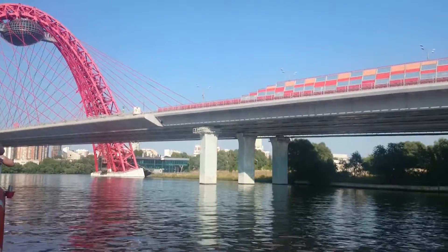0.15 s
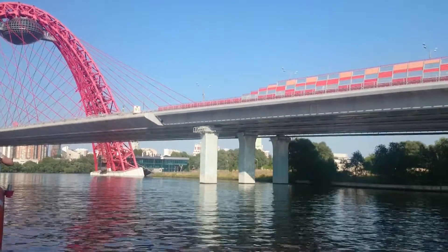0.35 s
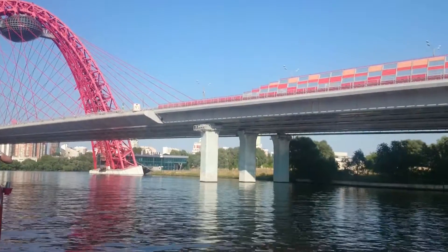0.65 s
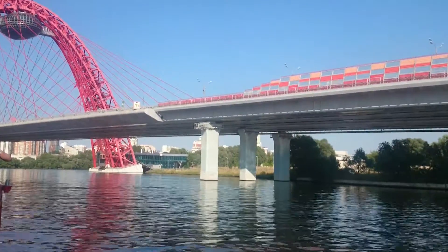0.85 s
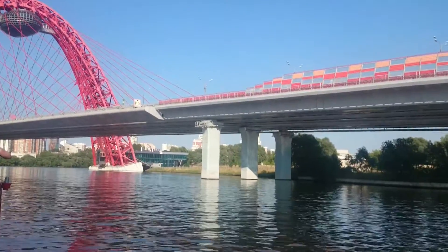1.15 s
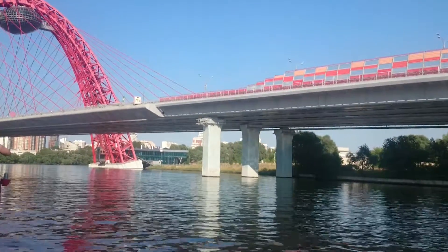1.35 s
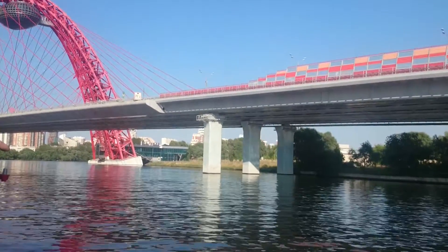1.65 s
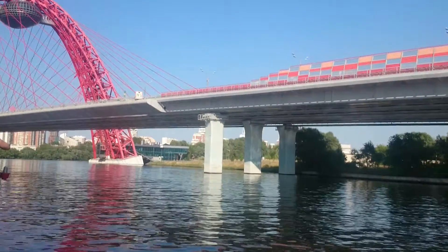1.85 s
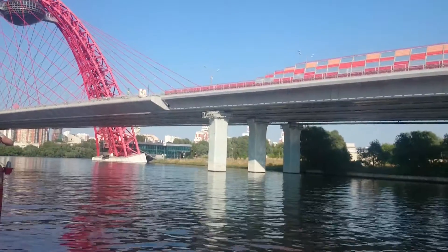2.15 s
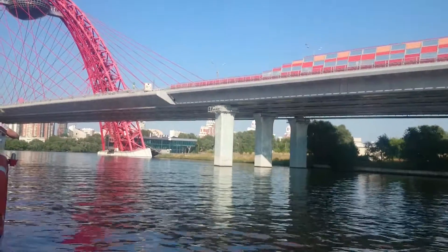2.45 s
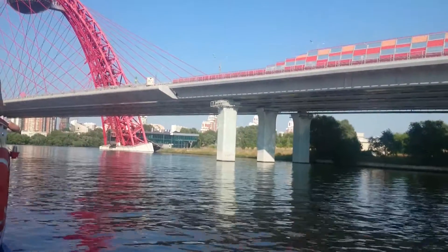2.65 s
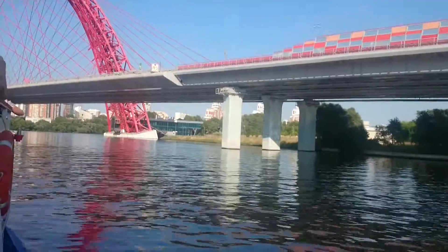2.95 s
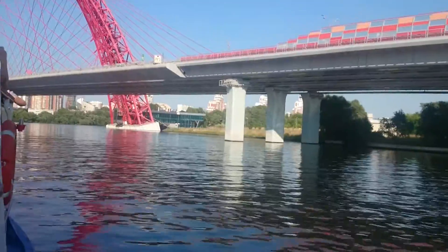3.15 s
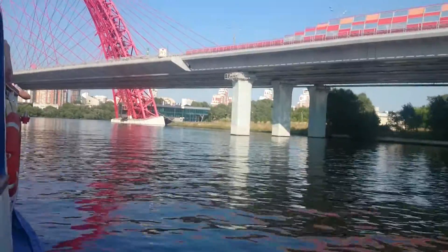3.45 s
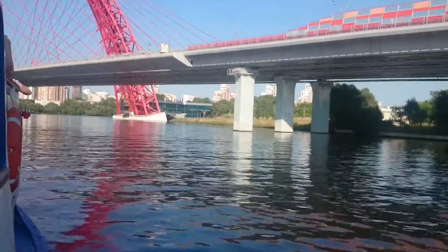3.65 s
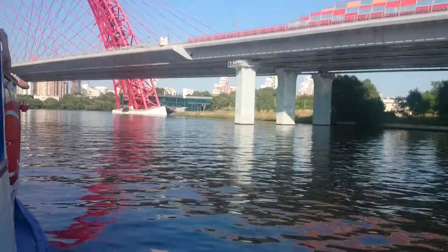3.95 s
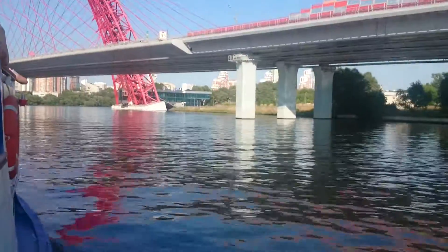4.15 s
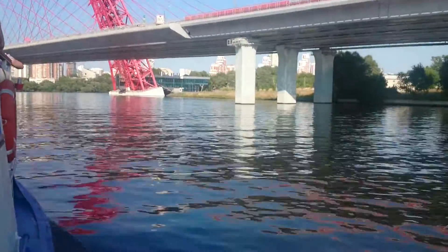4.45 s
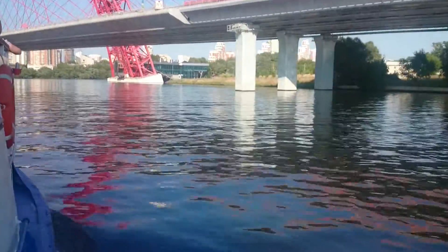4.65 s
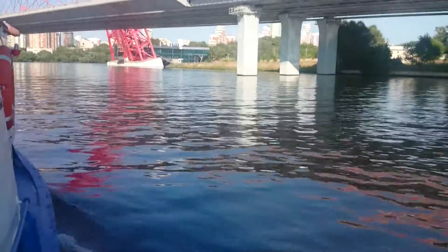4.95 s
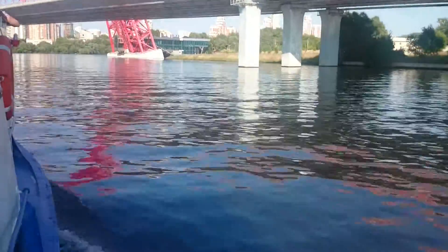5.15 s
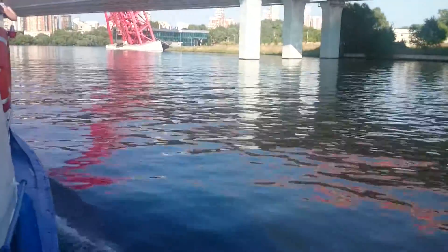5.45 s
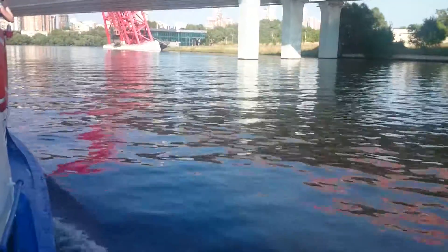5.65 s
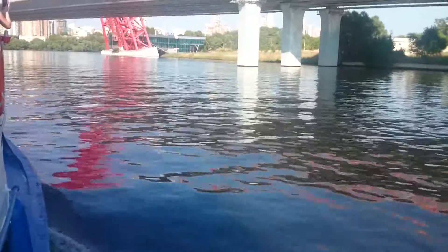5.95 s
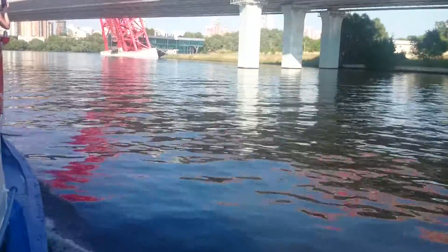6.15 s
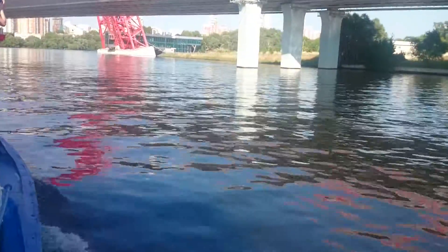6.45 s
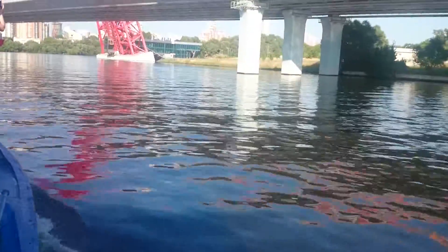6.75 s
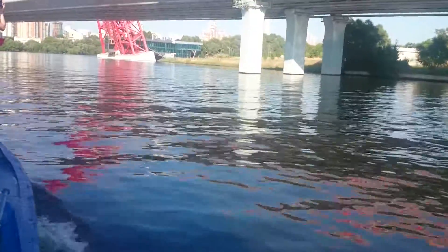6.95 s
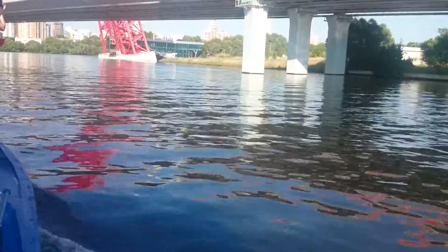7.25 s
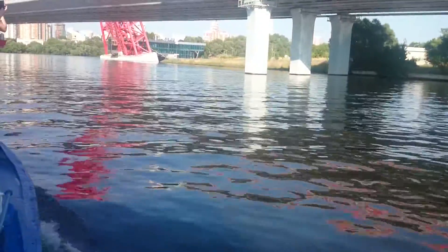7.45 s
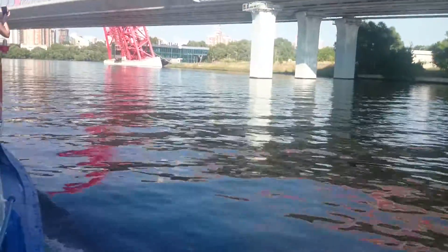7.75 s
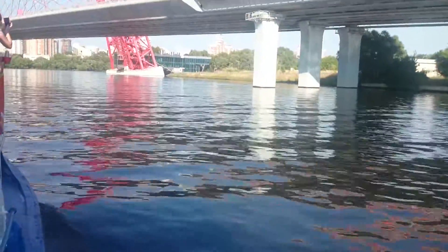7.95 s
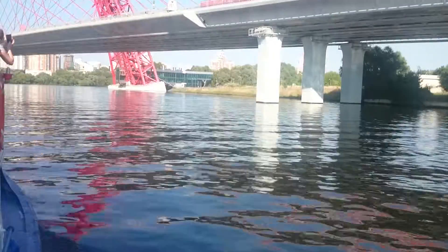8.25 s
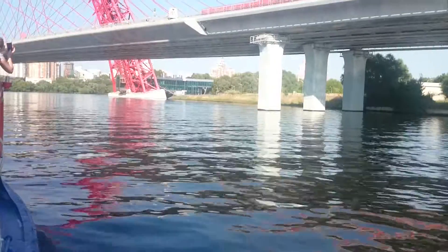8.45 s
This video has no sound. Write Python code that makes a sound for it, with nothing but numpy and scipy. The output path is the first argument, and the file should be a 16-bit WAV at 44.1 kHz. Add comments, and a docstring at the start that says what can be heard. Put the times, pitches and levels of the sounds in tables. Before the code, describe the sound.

On deck, a deep throbbing diesel-like drone with hissing and churning water, punctuated by regular rattly metallic clacks that stop before the end.

```python
"""Small river boat under way, heard from the deck

A six-cylinder four-stroke engine drones below: harmonic exhaust lines, hull knocks and beating machinery hiss.
Shaped noise makes rushing water, with one wave swelling under the bow, and a soft ventilation roar.
A loose part clacks about twice a second until it rests: noise bursts through resonances, with thin bright ticks.
The microphone tips towards the water and partly back, which shifts the balance."""
import sys
import numpy as np
from scipy import signal
from scipy.fft import rfft, irfft, next_fast_len
from scipy.io import wavfile
from scipy.ndimage import uniform_filter1d, map_coordinates

SR = 44100
rng = np.random.default_rng(int(sys.argv[2]) if len(sys.argv) > 2 else 0)


def wav_out(sig):
    """Save sig, one row per channel (or a flat mono array), as 16-bit PCM at SR to the path in sys.argv[1]."""
    wavfile.write(sys.argv[1], SR, np.round(np.clip(np.atleast_2d(sig).T, -1, 1) * 32767).astype(np.int16))


N = 378819  # samples
CYLINDERS = 6
FIRING_HZ = 43.845  # mean firings per second, all cylinders


def amp(db):
    """Decibels to gain."""
    return 10 ** (np.asarray(db) / 20)


def unit(x):
    """Scale to rms 1."""
    return x / np.sqrt(np.mean(x ** 2) + 1e-20)


def along(points, hz):
    """Interpolate (Hz, value) points on a log frequency axis."""
    point_hz, value = np.transpose(points)
    return np.interp(np.log(hz + 1), np.log(point_hz + 1), value)


def curves(rows):
    """One value per sample for each column after the time in seconds."""
    time_s, *columns = np.transpose(rows)
    return [np.interp(np.arange(N) / SR, time_s, column) for column in columns]


def wobble(rate_hz):
    """Smooth random curve through rate_hz random knots a second."""
    knots = rng.standard_normal(int(N * rate_hz / SR) + 4)
    return map_coordinates(knots, [np.arange(N) * rate_hz / SR])


def filtered(x, response):
    """Multiply the spectrum of x by a complex response of frequency."""
    n = x.shape[-1]
    padded = next_fast_len(n + 8192)
    spectrum = rfft(x, padded) * response(np.fft.rfftfreq(padded, 1 / SR))
    return irfft(spectrum, padded)[..., :n]


def coloured(x, spectrum):
    """Shape x by (Hz, relative dB) points, at rms 1."""
    return unit(filtered(x, lambda hz: amp(along(spectrum, hz))))


def sides(lean_db):
    """Left and right gains for a left-minus-right level difference."""
    return amp(np.array([[.5], [-.5]]) * lean_db)


# Level balance of the ports. Each row: frequency in Hz, left minus right in dB.
PORT_LEAN = [(44, -6.5), (80, -5.5), (200, -4), (380, -3.5), (520, -0.5), (800, -0.2), (1150, -2),
             (1700, -7), (2400, -2.5), (4000, -5.5)]
# Phase offset of the ports. Each row: frequency in Hz, lead of the left port in radians.
PORT_LEAD = [(44, 1), (90, 0.13), (160, 0.49), (380, 0.47), (700, 0.51), (1500, 0.31)]


def ports(hz):
    """Complex left and right gains: the two ports differ in level and phase."""
    half_turn = np.array([[.5j], [-.5j]])
    return sides(along(PORT_LEAN, hz)) * np.exp(half_turn * along(PORT_LEAD, hz))


# Likeness of the two sides before the ports. Each row: frequency in Hz, left-right correlation.
CORRELATION = [(100, 0.94), (250, 0.96), (600, 0.78), (1400, 0.39), (3000, 0.35), (7000, .1)]


def on_deck(pair):
    """Mix two unrelated signals into left and right: alike in the bass, louder on the right."""
    def mid_side_gains(hz):
        angle = np.arccos(np.clip(along(CORRELATION, hz), -1, 1)) / 2
        return np.array([np.cos(angle), np.sin(angle)])

    mid, side = filtered(pair, mid_side_gains)
    return unit(filtered(np.array([mid + side, mid - side]), ports))


def add(track, start_s, sound):
    """Mix a short stereo sound into track."""
    part = track[:, max(round(start_s * SR), 0):][:, :sound.shape[1]]
    part += sound[:, :part.shape[1]]


def rush(spectrum, patchy_db):
    """Stereo noise of rms 1 whose time-frequency gain varies in smooth random patches."""
    z = signal.stft(rng.standard_normal((2, N)), nperseg=512)[2]
    field = rng.standard_normal(z.shape[1:])
    field = uniform_filter1d(field, size=5, axis=0)  # frequency bins
    field = uniform_filter1d(field, size=12, axis=1)  # frames
    pair = signal.istft(z * amp(patchy_db * unit(field)), nperseg=512)[1][:, :N]
    return on_deck(coloured(pair, spectrum))


# Engine-room ventilation spectrum. Each row: frequency in Hz, relative spectral level in dB.
FAN_SPECTRUM = [(250, -34), (480, 8.5), (700, -4), (1200, -6), (1400, 4.5), (1750, 3), (2100, -2),
                (3500, -40), (7000, -49)]
FAN_LEVEL_DB, FAN_TILT_DB = -33, -8  # at no tilt; change at full tilt


def fan(tilt, patchy_db=1.2):
    """Soft roar of moving air that fades as the microphone turns away."""
    return amp(FAN_LEVEL_DB + FAN_TILT_DB * tilt) * rush(FAN_SPECTRUM, patchy_db)


# Churning water and hull rumble. Each row: frequency in Hz, relative spectral level in dB.
CHURN_SPECTRUM = [(25, -20), (32, -17), (42, -6), (60, 4), (100, 6.5), (165, 4.5), (240, 3.5), (320, -1),
                  (385, -1), (450, -2), (560, -3), (780, -9), (1080, -8), (1700, -9.5), (2200, -14.5),
                  (3300, -15), (7000, -44)]
# Water slapping under the bow. Each row: frequency in Hz, relative spectral level in dB.
BOW_SPECTRUM = [(120, -31), (270, -1.5), (450, -9), (600, -2), (760, -13.5), (1060, -1), (1350, -18),
                (2500, -30), (6000, -42)]
BOW_LEVEL_DB, BOW_TILT_DB = -39, 7  # at no tilt; change at full tilt
WAVE_CREST_S, WAVE_WIDTH_S = 3.35, 0.24  # width: crest to 1/e
WAVE_BOW_DB, WAVE_CHURN_DB = 3, 1  # rise at the crest


def water(tilt, churn_db=-23.5):
    """Turbulent churning plus bow wash that grows with tilt; one wave lifts both."""
    wave = np.exp(-((np.arange(N) / SR - WAVE_CREST_S) / WAVE_WIDTH_S) ** 2)
    churn_gain = amp(churn_db + WAVE_CHURN_DB * wave)
    bow_gain = amp(BOW_LEVEL_DB + BOW_TILT_DB * tilt + WAVE_BOW_DB * wave)
    churn = churn_gain * rush(CHURN_SPECTRUM, patchy_db=1.13)
    wash = bow_gain * rush(BOW_SPECTRUM, patchy_db=2.5)
    return churn + wash


def chatter(rise_s, t60_s, tail_db, tail_t60_s, grain_db):
    """Grainy burst of tiny contacts peaking after rise_s, plus a tail of scatter off the deck; rms 1."""
    t = np.arange(SR // 4) / SR - rise_s
    swell = np.clip(1 + t / rise_s, 0, 1) ** 2
    after = np.maximum(t, 0)
    grain = np.interp(t, np.linspace(t[0], t[-1], num=160), rng.standard_normal(160))
    contacts = unit(amp(grain_db * grain)) * amp(-60 * after / t60_s)
    tail = amp(tail_db - 60 * after / tail_t60_s)
    shared, left, right = rng.standard_normal((3, len(t)))
    return unit(swell * (contacts + tail) * (shared + np.array([left, right])))


# Bright edge of a contact. Each row: frequency in Hz, relative spectral level in dB.
SNAP_SPECTRUM = [(1500, -5), (4000, 10), (7500, 1), (9300, 1), (11000, 2.5), (13000, -2), (15500, -10)]
# Thin bright ticks, two of them the sharp snap of a clack.
# Each row: peak time in seconds, level in dB, left minus right in dB.
TICK_EVENTS = [(0.233, -40, 5), (2.059, -42, 5), (5.004, -53, -3), (5.648, -45, -1), (5.934, -44, 9)]


def ticks(rise_s=0.0034):
    """Bright noise bursts: light touches, and extra snap on two clacks."""
    out = np.zeros((2, N))
    for peak_s, db, lean_db in TICK_EVENTS:
        touch = chatter(rise_s=rise_s, t60_s=0.09, tail_db=-13, tail_t60_s=.15, grain_db=1)
        add(out, peak_s - rise_s, amp(db) * sides(lean_db) * coloured(touch, SNAP_SPECTRUM))
    return out


# Resonances of the loose part. Each row: centre in Hz, width in Hz, relative level in dB.
RING_MODES = [(1690, 360, -7), (2364, 190, 6), (2575, 92, 3.5), (2740, 137, 4), (3200, 830, -19)]
# Rasp of its contact. Each row: frequency in Hz, relative spectral level in dB.
RASP_SPECTRUM = [(900, -24), (1500, -15), (3500, -6.5), (4500, 0), (5400, 5.5), (6300, -17), (9000, -25)]
# Blows of the loose part. Each row: nominal time in seconds, ring level in dB, rasp level in dB.
CLACK_EVENTS = [(0.2263, -30.5, -46), (0.698, -39, -50), (1.158, -28.5, -43), (1.5972, -29.5, -34.5),
                (2.5282, -30, -30.5), (2.9846, -32, -31), (3.473, -35, -35.5), (3.9683, -42, -39),
                (4.3782, -33.5, -31.5), (4.827, -30.5, -37), (5.228, -29.5, -34), (5.9317, -32.5, -35),
                (6.3747, -40, -45)]


def ring_response(hz):
    """Sum of band-pass resonances of alternating sign."""
    total = 0
    for k, (centre_hz, width_hz, db) in enumerate(RING_MODES):
        damping = 1j * hz * width_hz
        total = total + (-1) ** k * amp(db) * damping / (centre_hz * centre_hz - hz * hz + damping)
    return total


def clacks(snap_db=-22, lean_db=-2.0, snap_lean_db=3, lead_s=.0092):
    """Loose part chatters on its seat and rings briefly; its bright snap scales with the ring."""
    out = np.zeros((2, N))
    for time_s, ring_db, rasp_db in CLACK_EVENTS:
        blow = chatter(rise_s=0.012, t60_s=0.09, tail_db=-13, tail_t60_s=0.3, grain_db=5.5)
        contact = chatter(rise_s=0.0085, t60_s=0.13, tail_db=-21, tail_t60_s=0.17, grain_db=2.5)
        ring = amp(ring_db) * unit(filtered(blow, ring_response))
        rasp = amp(rasp_db) * coloured(contact, RASP_SPECTRUM)
        snap = amp(ring_db + snap_db) * coloured(contact, SNAP_SPECTRUM)
        clack = sides(lean_db) * (ring + rasp) + sides(snap_lean_db) * snap
        add(out, time_s - lead_s, clack)
    return out


# Hiss at the left port. Each row: frequency in Hz, relative spectral level in dB.
LEFT_HISS_SPECTRUM = [(1500, -34), (3400, -11.5), (4400, 1.5), (5300, 2), (6000, -8.5), (6600, -11.5),
                      (9300, -14), (11000, -11.5), (12500, -22), (15000, -64)]
# Hiss at the right port. Each row: frequency in Hz, relative spectral level in dB.
RIGHT_HISS_SPECTRUM = [(1500, -35), (3700, -12.5), (4600, -3.5), (5150, -0.5), (5550, 2.5), (6100, -9),
                       (7000, -17), (8500, -24), (11000, -26.5), (12600, -35), (14000, -25.5), (15800, -30)]
# Hiss level before port offsets and flutter. Each row: time in seconds, level in dB.
HISS_CURVE = [(0, -29.7), (2.3, -29.8), (3.3, -29), (4.2, -28), (5.2, -29), (8.59, -28)]
# Clatter by cylinder in firing order. Each entry: relative strength in dB.
CYLINDER_CLATTER_DB = [-7, -9, 4, -45, 3.5, -3]


def hiss(cycle, clatter=0.25, flutter_db=.85, left_db=-3.0, right_db=6.0):
    """Machinery noise, independent at each port, that swells with the clatter of each cylinder."""
    hiss_db, = curves(HISS_CURVE)
    firing = cycle * CYLINDERS
    strength = amp(CYLINDER_CLATTER_DB)[np.round(firing).astype(int) % CYLINDERS]
    beat = unit(1 + clatter * strength * np.cos(np.pi * firing) ** 2)
    left, right = rng.standard_normal((2, N))
    left = amp(left_db) * coloured(left, LEFT_HISS_SPECTRUM)
    right = amp(right_db) * coloured(right, RIGHT_HISS_SPECTRUM)
    return np.array([left, right]) * beat * amp(hiss_db + flutter_db * wobble(18))


# What the hull passes of each firing. Each row: frequency in Hz, relative spectral level in dB.
HULL_SPECTRUM = [(35, -50), (55, 5), (90, -2), (200, -0.5), (240, -22), (320, -10), (380, 1), (450, -10),
                 (600, -2), (720, -8), (1050, -8), (1250, -19), (1400, -7), (3000, -37)]


def knocks(cycle, t60_s=0.22, scatter_db=2.0, level_db=-30.0):
    """Each cylinder shakes the hull along its own decaying path, so the pattern repeats every cycle."""
    t = np.arange(SR // 8) / SR
    paths = rng.standard_normal((CYLINDERS, 2, len(t))) * amp(-60 * t / t60_s)
    firings = np.flatnonzero(np.diff(np.floor(cycle * CYLINDERS)))
    out = np.zeros((2, N))
    for k, sample in enumerate(firings):
        add(out, sample / SR, paths[k % CYLINDERS] * amp(scatter_db * rng.standard_normal()))
    return amp(level_db) * on_deck(coloured(out, HULL_SPECTRUM))


# Engine lines. Each row: multiple of the four-stroke cycle rate, rms level in dB before swell, drift and ports.
ENGINE_LINES = [(6, -24), (7, -43.5), (8, -39), (9, -41.5), (10, -40), (11, -38.5), (12, -29), (15, -35),
                (18, -53), (19, -32.5), (20, -28), (21, -24), (22, -32.5), (23, -29), (25, -37), (26, -32),
                (27, -25), (30, -41.5), (34, -37.5), (36, -39.5), (40, -39), (52, -45), (55, -42),
                (67, -42), (71, -43.5), (78, -47.5), (81, -41), (86, -45), (88, -44), (104, -47.5),
                (142, -47.5), (156, -47)]
# Cylinders in firing order; weak ones make the engine lope. Each entry: relative strength in dB.
CYLINDER_FIRING_DB = [-3, -0.5, 1.8, -1.5, -1.5, 1]
THROB_TILT_DB, BOOM_TILT_DB = -1.8, .7  # change over the full tilt


def exhaust(cycle, tilt, waver_db=0.0, hull_waver_db=2.0, dispersion_cycles=.179):
    """Firing harmonics align into one pulse; unequal cylinders add the lines between them."""
    lope_db = np.interp(cycle * CYLINDERS, np.arange(CYLINDERS), CYLINDER_FIRING_DB, period=CYLINDERS)
    tilt_change = tilt - tilt.mean()
    throb_db = THROB_TILT_DB * tilt_change
    boom_db = BOOM_TILT_DB * tilt_change + lope_db
    waver = [(44, waver_db / 2), (150, waver_db), (500, hull_waver_db)]  # Hz, dB: high lines are less steady
    out = np.zeros((2, N))
    for order, db in ENGINE_LINES:
        order = round(order)
        hz = order * FIRING_HZ / CYLINDERS
        # the hull smears the in-between lines over the cycle
        lag = dispersion_cycles * order ** 2 * (order % CYLINDERS > 0)
        swell_db = throb_db if order <= 2 * CYLINDERS else boom_db
        drift_db = along(waver, hz) * wobble(7)
        line = -np.sqrt(2) * np.exp(2j * np.pi * (order * cycle - lag))
        out += amp(db + swell_db + drift_db) * (ports(hz) * line).real
    return out


# Microphone tipping towards the water. Each row: time in seconds, tilt from 0 (level) to 1 (fully down).
MICROPHONE_TILT = [(0, 0), (2.2, 0.16), (3.2, .45), (5.6, 0.99), (7.5, 1), (8.59, 0.48)]
HUNTING = .001  # scale of the governor's random speed wander, as a share of FIRING_HZ


def scene():
    """One crankshaft drives exhaust, knocks and hiss; air, water, clacks and ticks are added."""
    tilt, = curves(MICROPHONE_TILT)
    firing_hz = FIRING_HZ * (1 + HUNTING * wobble(7))
    cycle = np.cumsum(firing_hz) / SR / CYLINDERS  # engine cycles elapsed
    engine = exhaust(cycle, tilt) + knocks(cycle) + hiss(cycle)
    return engine + fan(tilt) + water(tilt) + clacks() + ticks()


def record(dry, ceiling=.92, top_hz=15900):
    """Round off the highest peaks smoothly, then remove everything from top_hz up."""
    rounded = dry / (1 + np.abs(dry / ceiling) ** 8) ** (1 / 8)
    return filtered(rounded, lambda hz: hz < top_hz)


dry = scene()
out = record(dry)
wav_out(out)
```